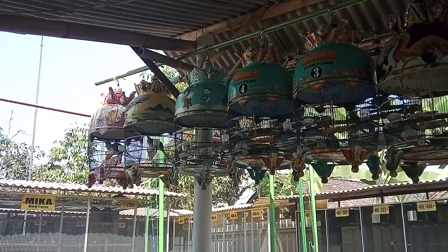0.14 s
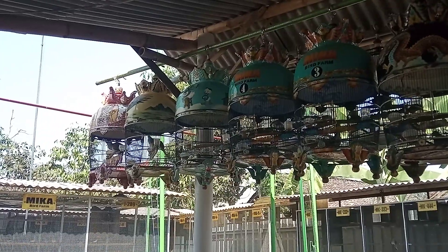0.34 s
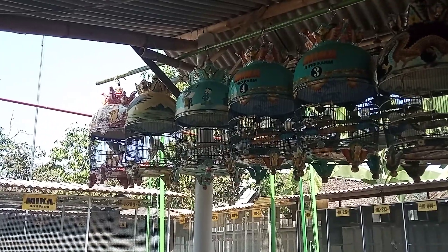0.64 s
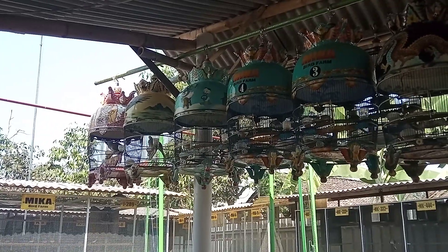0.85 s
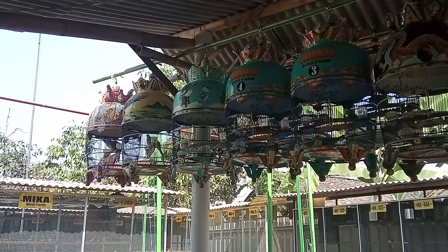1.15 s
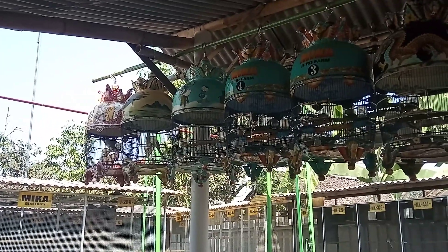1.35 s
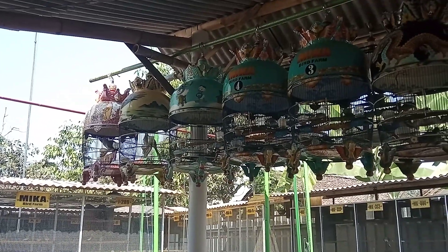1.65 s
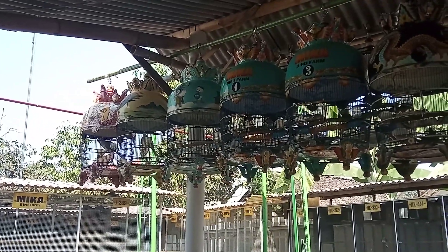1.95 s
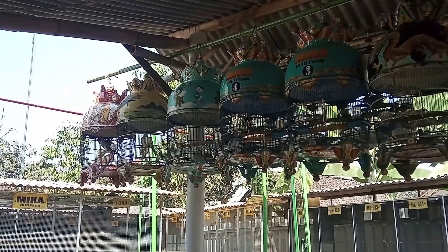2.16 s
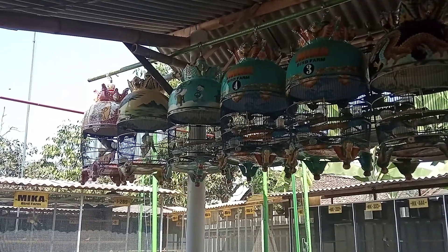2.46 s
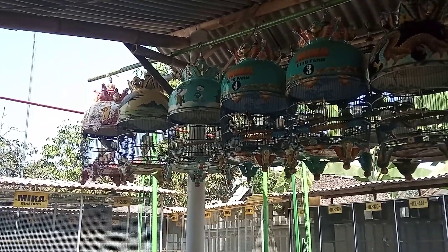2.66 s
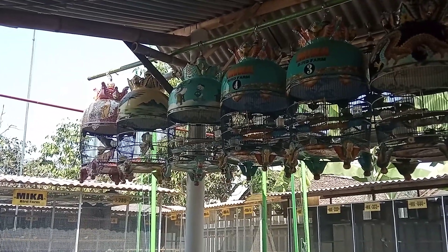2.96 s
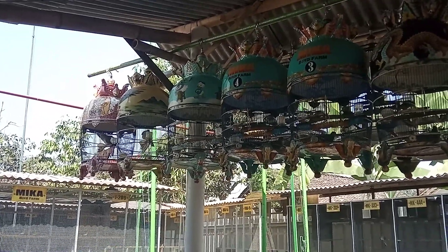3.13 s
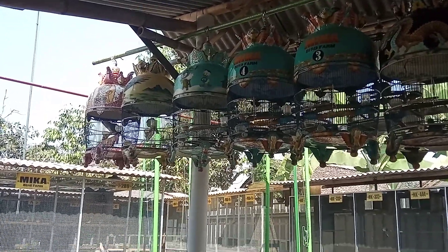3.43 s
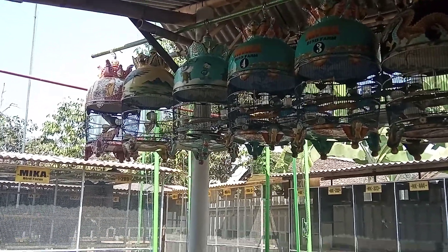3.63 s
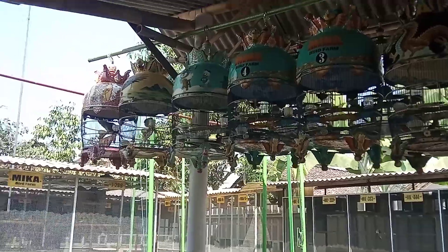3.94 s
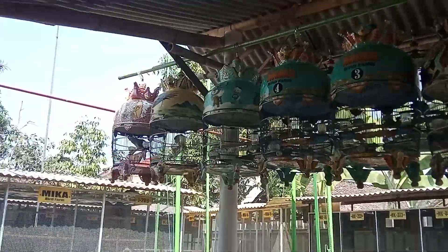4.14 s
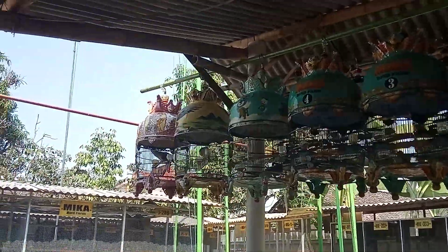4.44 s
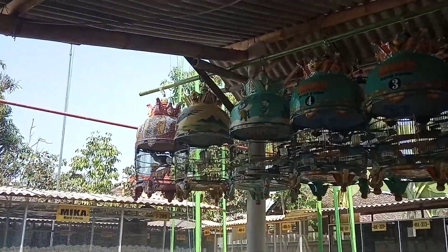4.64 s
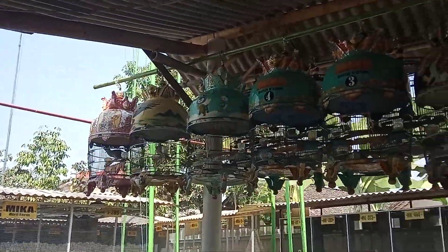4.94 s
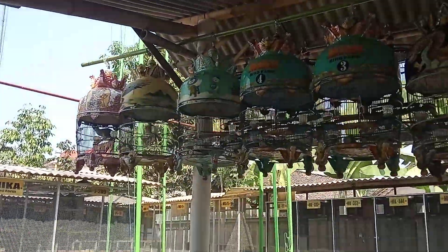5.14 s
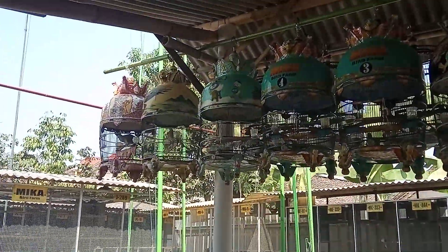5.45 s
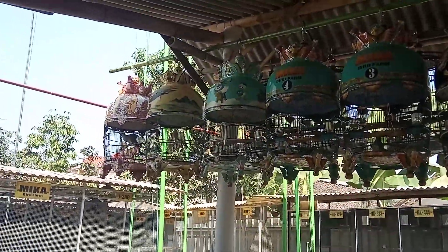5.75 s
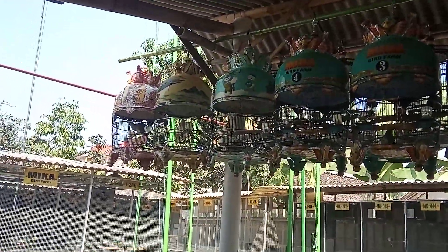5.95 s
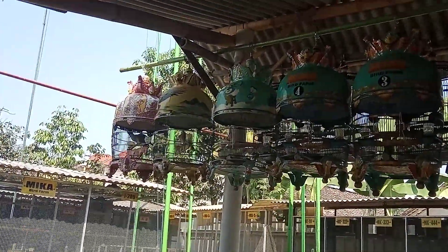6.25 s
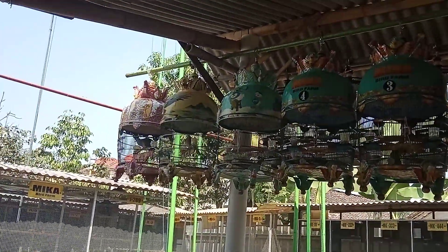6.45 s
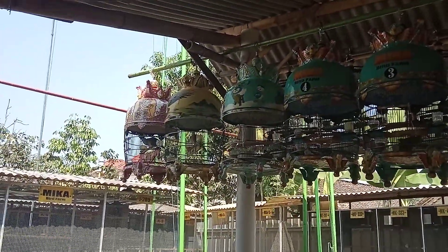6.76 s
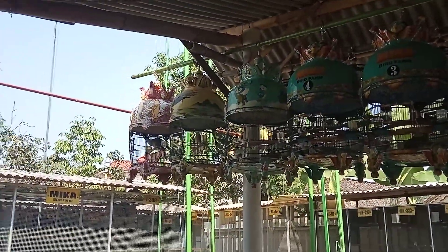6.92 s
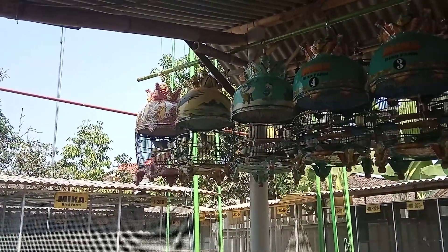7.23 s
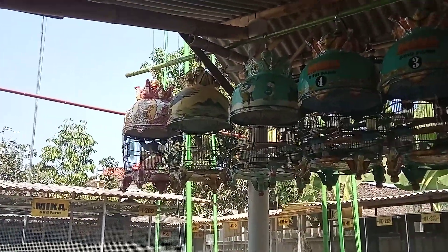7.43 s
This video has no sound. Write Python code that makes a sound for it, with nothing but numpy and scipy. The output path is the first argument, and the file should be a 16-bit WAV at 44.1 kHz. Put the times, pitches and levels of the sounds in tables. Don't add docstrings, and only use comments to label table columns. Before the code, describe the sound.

Several doves sing over one another, soft low coos giving way to louder higher ones, amid sparse chirps, husk cracks and low engine murmur.

```python
import sys
import numpy as np
from scipy import signal
from scipy.fft import rfft, irfft, next_fast_len
from scipy.io import wavfile
from scipy.ndimage import uniform_filter1d, map_coordinates

SR = 44100
rng = np.random.default_rng(int(sys.argv[2]) if len(sys.argv) > 2 else 0)


def makeup_ratio(level_db):
    decades = np.asarray(level_db, float) / 20
    return 10 ** decades


def dump(signal):
    limited = np.clip(np.atleast_2d(signal).T, -1, 1)
    pcm = np.round(limited * 32767).astype(np.int16)
    wavfile.write(sys.argv[1], SR, pcm)


N = 334719
TIME = np.arange(N) / SR


def unit(x):
    return x / np.sqrt(np.mean(x ** 2) + 1e-20)


def along(points, hz):
    f, v = np.transpose(points)
    return np.interp(np.log(hz + 1), np.log(f + 1), v)


def curves(rows):
    s, *columns = np.transpose(rows)
    return [np.interp(TIME, s, column) for column in columns]


def wobble(rate):
    knots = rng.standard_normal(int(8 * 200) + 4)
    return map_coordinates(knots, [TIME * min(rate, 199)])


def coloured(x, spectrum):
    m = next_fast_len(len(x) + 8192)
    closed = [(spectrum[0][0] * .8, -120), *spectrum, (spectrum[-1][0] * 1.2, -120)]
    gain = makeup_ratio(along(closed, np.fft.rfftfreq(m, 1 / SR)))
    return unit(irfft(rfft(x, m) * gain, m)[:len(x)])


def rush(spectrum, patchy_db, bins, frames):
    z = signal.stft(rng.standard_normal(N), nperseg=512)[2]
    field = uniform_filter1d(rng.standard_normal(z.shape), bins, axis=0)
    field = uniform_filter1d(field, frames, axis=1)
    patchy = signal.istft(z * makeup_ratio(patchy_db * unit(field)), nperseg=512)[1][:N]
    return coloured(patchy, spectrum)


def swell(s, length, rise, point):
    span = np.arange(max(round(s * SR), 0), min(round((s + length) * SR), N))
    u = np.clip((span / SR - s) / length, 0, 1)
    warp = np.log(.5) / np.log(np.clip(rise, .05, .95))
    return span, u, np.abs(np.sin(np.pi * u ** warp)) ** point


# start_s, pitch_hz, level_db
LEAD_NOTE = [
    (4.775, 855, -38),
    (4.81, 890.5, -35.5),
    (4.94, 868.3, -35),
    (4.981, 856, -29.5),
    (5.003, 848, -33.5),
    (5.022, 836, -31.5),
    (5.036, 825, -36),
]


def lead():
    hz, db = curves(LEAD_NOTE)
    to_nearer_end = np.minimum(TIME - LEAD_NOTE[0][0], LEAD_NOTE[-1][0] - TIME)
    held = np.clip(to_nearer_end / .008 + 1, 0, 1)
    return np.sqrt(2) * makeup_ratio(db) * held * np.sin(2 * np.pi * np.cumsum(hz) / SR)


# time_after_start_s, pitch_hz
PHRASE_PITCH = [
    (0, 641.5),
    (.16, 615),
    (.4, 592),
    (.52, 559),
    (.62, 502),
    (.74, 420),
]
PHRASE_TIMES = [
    0.217,
    2.575,
    4.87,
]


def phrase_hz(t):
    start = max(s for s in PHRASE_TIMES if s < t[-1])
    return np.interp(t - start, *np.transpose(PHRASE_PITCH))


def whistles(rows, octave_db, waver, flutter_db, rise, point):
    out = np.zeros(N)
    drift = 1 + waver * wobble(35 + 2500 * waver)
    flutter = makeup_ratio(flutter_db * wobble(35 + 1500 * waver))
    scoop = 0.033
    for s, length, db, *ends in rows:
        span, u, arch = swell(s, length, rise, point)
        if ends:
            hz = np.interp(u, [0, 1], ends) * (1 - scoop * (1 - arch))
        else:
            hz = phrase_hz(span / SR)
        phase = 2 * np.pi * np.cumsum(hz * drift[span]) / SR
        tone = np.sin(phase) + makeup_ratio(octave_db) * np.sin(2 * phase)
        out[span] += np.sqrt(2) * makeup_ratio(db) * arch * flutter[span] * tone
    return out


# start_s, length_s, level_db
PHRASE_SYLLABLES = [(.2, 0.22, -51), (.42, 0.14, -52.5), (.57, 0.1, -57), (.66, 0.14, -41),
                    (.79, 0.079, -47.5), (.86, 0.057, -53.5), (2.58, 0.091, -54.5), (2.685, 0.16, -46.5),
                    (2.85, 0.095, -52), (2.99, 0.14, -43.5), (3.12, 0.048, -48), (4.87, 0.1, -53.5),
                    (4.95, 0.14, -48.5), (5.12, 0.16, -54), (5.26, 0.12, -47), (5.38, 0.042, -44),
                    (5.44, 0.065, -50)]
# start_s, length_s, level_db, first_hz, last_hz
LOW_NOTES = [(-.08, 0.31, -51, 508, 412), (-.04, 0.15, -49, 580, 538), (.05, 0.19, -57, 575, 565),
             (1.59, 0.076, -59, 523, 640), (1.63, 0.13, -52.5, 697, 631), (1.685, 0.16, -47.5, 632, 605),
             (1.88, 0.1, -69.5, 634, 628), (2.075, 0.063, -57.5, 409, 495), (2.122, 0.054, -43.5, 478, 478),
             (2.18, 0.13, -48.5, 472.6, 456), (3.14, 0.156, -42, 486, 476), (3.22, 0.47, -53, 486, 461.5),
             (3.55, 0.12, -46.5, 461.5, 451), (3.98, 0.081, -55, 563, 685), (4.06, 0.13, -46.5, 657.3, 614),
             (4.09, 0.076, -60, 631, 631), (4.21, 0.097, -68.5, 606, 662)]
# start_s, length_s, level_db, first_hz, last_hz
HIGH_NOTES = [(2.93, 0.15, -46, 721, 805), (3.09, 0.1, -43.5, 778, 743), (4.7, 0.11, -40.5, 702.7, 741),
              (4.75, 0.052, -37.5, 752, 770), (5.05, 0.04, -36.5, 810, 770), (5.09, 0.022, -37, 820, 790),
              (5.385, 0.05, -39.5, 722, 722), (5.41, 0.068, -41.5, 722, 718), (5.49, 0.09, -49, 712, 705),
              (5.57, 0.095, -45, 700, 690), (5.84, 0.064, -44.5, 685, 726), (5.968, 0.034, -40.5, 725, 742),
              (6.01, 0.095, -40, 700, 682), (6.11, 0.048, -43.5, 691, 674), (6.61, 0.12, -46.5, 673, 726),
              (6.755, 0.155, -38.5, 700, 690), (6.955, 0.11, -46, 741, 725), (7.13, 0.13, -51.5, 738, 758),
              (7.21, 0.1, -47, 721, 572), (7.29, 0.23, -47, 712, 691), (7.45, 0.24, -46, 717, 683)]
# start_s, length_s, level_db, first_hz, last_hz
WARM_NOTES = [
    (5.735, 0.165, -32.5, 765, 776),
    (5.893, 0.035, -39, 770, 760),
    (5.94, 0.035, -39, 745, 730),
    (6.73, 0.185, -35, 750, 748),
    (6.915, 0.045, -39, 735, 745),
]
# start_s, length_s, level_db, first_hz, last_hz
REEDY_NOTES = [
    (.25, 0.444, -65, 667, 681),
    (.96, 0.68, -64.5, 667, 667),
]
# start_s, length_s, level_db, first_hz, last_hz
FAR_NOTES = [
    (2.82, 0.4, -49.5, 455, 435),
    (4.8, 0.2, -55, 490, 470),
    (4.58, 0.133, -60, 1190, 1300),
    (3.26, 0.567, -58, 590, 570),
    (6.51, 0.17, -58, 990, 890),
    (6.45, 0.45, -62.5, 620, 600),
]
# start_s, length_s, level_db, first_hz, last_hz
MURMUR_NOTES = [(1.0, 0.5, -66, 565, 575), (1.1, 0.12, -74, 450, 420), (0.57, 0.12, -78, 900, 910),
                (0.19, 0.08, -76, 870, 910), (0.18, 0.2, -70, 340, 310), (.8, .13, -54, 470, 455),
                (.13, 0.071, -76, 1400, 1260), (0.85, 0.14, -78, 1300, 1270), (1.33, 0.08, -72, 1170, 1140),
                (1.84, 0.16, -74, 810, 810), (2.1, 0.04, -72, 800, 800), (2.19, 0.04, -69, 800, 800),
                (2.27, 0.04, -69, 800, 800), (3.66, 0.081, -61, 440, 425), (3.74, 0.19, -67, 410, 385),
                (5.55, 0.16, -62.5, 430, 420), (1.18, .13, -77, 3600, 3550), (7.26, 0.19, -71, 1270, 1270),
                (7.36, .1, -66, 1340, 1370), (7.3, 0.156, -69, 1100, 1080), (6.5, 0.16, -65, 1270, 1260),
                (6.47, 0.13, -65, 1170, 1180), (6.66, 0.12, -65, 1150, 1110), (6.91, 0.05, -71, 1170, 1170),
                (1.65, 0.22, -78, 1400, 1640), (1.93, .09, -77, 1680, 1660), (4.278, .02, -66, 7150, 7150)]


def clear_coos():
    clear = lead()
    clear += whistles(PHRASE_SYLLABLES, octave_db=-48, waver=0.003, flutter_db=.6, rise=0.5, point=0.65)
    clear += whistles(LOW_NOTES, octave_db=-51, waver=.003, flutter_db=1.1, rise=.42, point=.7)
    clear += whistles(HIGH_NOTES, octave_db=-62, waver=.003, flutter_db=1.5, rise=0.47, point=0.6)
    clear += whistles(WARM_NOTES, octave_db=-33, waver=0.003, flutter_db=1.1, rise=.52, point=.7)
    clear += whistles(REEDY_NOTES, octave_db=-12, waver=0.006, flutter_db=3, rise=0.51, point=0.31)
    far = whistles(FAR_NOTES, octave_db=-40, waver=.038, flutter_db=4, rise=.45, point=.6)
    murmur = whistles(MURMUR_NOTES, octave_db=-40, waver=.016, flutter_db=5, rise=.45, point=.6)
    return clear + makeup_ratio(-5) * far + makeup_ratio(-3) * murmur


def roll(rows, throat, rate, breath, point, clean):
    cycle = np.cumsum(rate * makeup_ratio(1.6 * wobble(25))) / SR
    puffs = (.5 + .5 * np.cos(2 * np.pi * cycle)) ** 3
    beats = (np.diff(np.floor(cycle), prepend=0) > 0) * makeup_ratio(3.1 * wobble(70))
    source = unit((puffs + breath) * rng.standard_normal(N)) + clean * unit(beats)
    level = np.zeros(N)
    for s, length, db, rise in rows:
        span, _, arch = swell(s, length, rise, point)
        level[span] += makeup_ratio(db) * arch
    return level * coloured(source, throat)


# start_s, length_s, level_db, rise_share (of the length before the peak)
DEEP_ROLLS = [
    (-.05, 0.41, -57.5, 0.44),
    (1.595, 0.38, -62, 0.1),
    (2.07, 0.72, -54.5, 0.51),
    (2.28, 0.14, -64, 0.22),
    (2.62, 0.76, -60, 0.56),
    (3.975, 0.16, -58, 0.16),
    (4.42, .53, -56.5, 0.62),
    (7.17, 0.32, -57.5, 0.4),
]
# start_s, length_s, level_db, rise_share
HIGH_ROLLS = [
    (2.5, 0.16, -78, 0.79),
    (2.9, 0.4, -56.5, 0.37),
    (3.15, 0.63, -55.5, 0.22),
    (4.65, 0.29, -52, 0.5),
    (5.05, 0.16, -50.5, 0.056),
    (5.32, 0.22, -57.5, 0.2),
    (5.67, 0.71, -48.5, 0.38),
    (6.59, 0.56, -47, 0.64),
    (7.0, 0.52, -52.5, 0.35),
]
# pitch_hz, level_db
DEEP_RESONANCE = [(360, -35), (430, -14.5), (540, 8), (600, 5), (670, -9.5), (780, -19.5)]
# pitch_hz, level_db
HIGH_RESONANCE = [(320, -100), (540, -30.5), (666, -1), (738, 1.5), (827, 0.5), (900, -3.5), (1080, -26),
                  (1300, -35.5), (1690, -113), (2860, -120)]


def hoarse_coos():
    deep = roll(DEEP_ROLLS, DEEP_RESONANCE, rate=38, breath=0.12, point=1.0, clean=.8)
    return deep + roll(HIGH_ROLLS, HIGH_RESONANCE, rate=66, breath=0.2, point=0.75, clean=1.5)


# start_s, level_db, pitch_hz, hold_s (before the drop)
SPARROW_CHIRPS = [(0.234, -58, 4300, 0.014), (0.9712, -54.5, 4300, 0.017), (1.095, -55.5, 3584, 0.03),
                  (2.0859, -54.5, 4200, 0.019), (2.396, -55, 3550, 0.03), (3.002, -51.5, 4400, 0.017),
                  (3.1533, -50, 3560, 0.033), (3.9932, -50.5, 4300, 0.01), (4.174, -49, 3600, 0.036),
                  (4.757, -47.5, 4400, 0.02), (5.0624, -50.5, 3500, 0.032), (5.5675, -49, 4300, 0.018),
                  (5.975, -49.5, 4310, 0.017), (6.1518, -50, 3600, 0.043), (6.515, -60, 3915, .07),
                  (6.9588, -50.5, 4300, 0.018)]


def sparrows():
    out, t = np.zeros(N + SR), TIME[:SR // 5]
    chirp_s, drop_s = 0.09, 0.04
    end_hz, sag_hz_per_s = 2857, 5000
    buzz_depth = 0.11
    shape = np.abs(np.sin(np.pi * np.clip(t / chirp_s, 0, 1) ** .6)) ** .8
    for s, db, hz, hold in SPARROW_CHIRPS:
        trill_depth, trill_hz = rng.uniform(.02, .05), rng.uniform(90, 170)
        trill = trill_depth * np.sin(2 * np.pi * trill_hz * t + rng.uniform(0, 6))
        uneven = 1 + .15 * unit(uniform_filter1d(rng.standard_normal(len(t)), size=400))
        buzz = buzz_depth * np.sin(2 * np.pi * np.cumsum(500 * uneven) / SR)
        drop = np.sin(np.pi / 2 * np.clip((t - hold) / drop_s, 0, 1)) ** 2
        sag = sag_hz_per_s * np.maximum(t - hold - drop_s, 0)
        glide = hz + (end_hz - hz) * drop - sag
        phase = 2 * np.pi * np.cumsum(glide * (1 + trill + buzz)) / SR
        scratch = makeup_ratio(4 * unit(uniform_filter1d(rng.standard_normal(len(t)), size=180)))
        rasp = coloured(rng.standard_normal(len(t)), [(2400, 3.5), (3500, 31.5), (6500, 13.0), (8000, -40)])
        tone = np.sin(phase) + makeup_ratio(-14) * np.sin(2 * phase) + makeup_ratio(-8) * rasp
        out[round(s * SR):][:len(t)] += makeup_ratio(db - 9) * shape * scratch * tone
    return out[:N]


# start_s, level_db, dull_db (dull part)
WIRE_TICKS = [(0.419, -50, -4.5), (1.295, -46, -17), (1.3348, -49.5, 6), (1.609, -46, -21),
              (1.705, -46, -34), (1.7573, -48.5, -41), (1.8087, -41, -28), (2.2284, -48.5, -10),
              (2.394, -49, 7.5), (2.527, -53, -3), (3.975, -55.5, 1), (4.368, -51, -27),
              (4.414, -45, -13.5), (4.461, -47.5, -30), (4.618, -58, -10), (4.664, -57, -21),
              (4.753, -46.5, -2.5), (5.296, -63, -17), (5.658, -66.5, 3), (5.7234, -55, -1.5),
              (5.9561, -54.5, 3.5), (6.124, -50, -13), (6.1726, -61, 17.5), (6.21, -55, 9),
              (6.497, -61, -24), (6.608, -49.5, -13), (6.683, -51.5, -21), (7.5071, -45.5, -27)]
# pitch_hz, level_db, t60_s
WIRE_MODES = [(6150, 8, 0.07), (6760, -6, 0.1), (7140, 14, 0.07), (8400, 12, 0.075), (9480, 9, 0.06),
              (3800, 0, 0.2)]
# pitch_hz, level_db
RATTLE_SPECTRUM = [(2350, -44), (3900, -5), (5200, -11), (6200, 5), (8500, 4), (10500, 0), (13100, -4),
                   (15600, -11.5)]


def ticks():
    out, t = np.zeros(N + SR), TIME[:SR // 6]
    for s, db, dull_db in WIRE_TICKS:
        ring = np.zeros(len(t))
        for hz, level, t60 in WIRE_MODES:
            decay = makeup_ratio(level + rng.normal(0, 4) - 60 * t / t60)
            ring += decay * np.sin(2 * np.pi * hz * rng.normal(1, 0.019) * t)
        rattle = coloured(rng.standard_normal(len(t)), RATTLE_SPECTRUM)
        rattle *= makeup_ratio(-60 * t / 0.17) + makeup_ratio(-60 * t / 0.006)
        dull = coloured(rng.standard_normal(len(t)), [(2300, -4.0), (3200, 7.5), (4600, -1.5)])
        dull *= makeup_ratio(dull_db - 60 * t / 0.14)
        onset = 1 - np.exp(-t / 0.0011)
        out[round(s * SR):][:len(t)] += makeup_ratio(db - 9.5) * onset * (makeup_ratio(-10) * ring + rattle + dull)
    return out[:N]


# start_s, level_db
HUSK_CRACKS = [(0.1257, -56.5), (0.613, -65), (0.6504, -59.5), (0.7206, -55), (0.817, -63), (0.862, -56),
               (1.058, -54.5), (1.934, -49), (2.0205, -51), (2.1137, -50), (2.1678, -55), (2.378, -54),
               (2.7307, -52), (2.8464, -53), (2.916, -50), (3.155, -53), (3.334, -53), (3.5498, -66),
               (3.683, -55.5), (3.847, -65), (3.8681, -62), (4.281, -55), (4.56, -58), (4.8336, -51),
               (4.903, -46), (5.357, -48.5), (5.403, -57.5), (5.439, -50), (5.876, -50.5), (6.06, -49.5),
               (6.35, -48.5), (6.552, -50), (7.001, -69), (7.0838, -49), (7.1527, -49), (7.199, -60),
               (7.329, -56)]
# pitch_hz, level_db
HUSK_SPECTRUM = [(2500, -7), (4500, -9.5), (6500, 2), (8000, -3.5), (10000, 3.5), (13000, -7.5),
                 (15600, -6)]


def husks():
    out, t = np.zeros(N + SR), TIME[:SR // 6]
    fade = makeup_ratio(-60 * t / 0.008) + 1.25 * makeup_ratio(-60 * t / 0.26)
    for s, db in HUSK_CRACKS:
        crack = coloured(rng.standard_normal(len(t)), HUSK_SPECTRUM)
        out[round(s * SR):][:len(t)] += makeup_ratio(db - 16.0) * fade * crack
    return out[:N]


# start_s, level_db
WIRE_SNAPS = [
    (0.4196, -54),
    (1.3357, -46),
    (5.283, -50),
    (5.9585, -38.5),
    (6.0581, -50),
    (6.175, -35.5),
    (7.5076, -44),
]
# pitch_hz, level_db
SNAP_SPECTRUM = [(1500, -14), (3000, -13), (6000, 0), (9000, -9), (14000, -21)]


def snaps():
    blows = np.zeros(N)
    for s, db in WIRE_SNAPS:
        blows[round(s * SR)] = makeup_ratio(db)
    click = coloured(np.arange(201) == 100, SNAP_SPECTRUM)
    return signal.fftconvolve(blows, click / click.max(), "same")


# start_s, level_db, length_s
WING_BEATS = [
    (1.465, -48, 0.092),
    (2.598, -56.5, 0.059),
    (2.768, -53, 0.072),
    (5.326, -53.5, 0.13),
    (7.189, -56, 0.026),
    (7.474, -53, 0.31),
]
# pitch_hz, level_db
PUFF_SPECTRUM = [(130, 4.5), (300, 3.5), (650, 0.5), (900, -15)]


def wings():
    out, t = np.zeros(N + SR), TIME[:SR // 5]
    for s, db, length in WING_BEATS:
        shape = np.sin(np.pi * np.clip(t / length, 0, 1) ** 0.45) ** 0.9
        puff = coloured(rng.standard_normal(len(t)), PUFF_SPECTRUM)
        out[round(s * SR):][:len(t)] += makeup_ratio(db - 7.0) * shape * puff
    return out[:N]


# pitch_hz, t60_s
ROOF_DECAY = [(300, 0.25), (1000, 0.35), (4000, 0.33), (12000, 0.066)]


def roof(x):
    hz, t, z = signal.stft(rng.standard_normal(SR // 2), SR, nperseg=256)
    decay = makeup_ratio(-60 * t / along(ROOF_DECAY, hz)[:, None])
    tail = signal.istft(z * decay, SR, nperseg=256)[1]
    delayed = np.pad(x, (300, 0))
    return signal.fftconvolve(delayed, tail / np.linalg.norm(tail))[:N]


# start_s, level_db
ROAD_LEVEL = [
    (0.0, -68),
    (0.32, -75.5),
    (7.59, -68),
]
# start_s, depth_db
ENGINE_LULLS = [(.48, 14.5), (1.18, 10.5), (1.53, 25.5), (1.97, 26), (2.641, 32.5), (3.06, 23.5),
                (3.46, 8.5), (3.8, 2.5), (4.232, 15), (4.62, -1), (5.401, 14.5), (5.849, 23.5)]
FIRING_LINES = [-1, -9, -8.5, -26.5]
# pitch_hz, level_db
ROAR_SPECTRUM = [(15, -71), (25, -10.5), (65, 8.5), (150, 6.5), (195, 0.5), (241, -2.5), (356, -19.5),
                 (420, -34), (550, -49), (920, -120)]
# start_s, length_s, level_db, first_hz, last_hz
ENGINE_REVS = [
    (-.05, 0.49, -60, 121.2, 147),
    (3.13, 0.44, -59.5, 167.7, 164.7),
    (3.52, 0.22, -55, 164.4, 172),
    (3.75, 0.29, -58.5, 185.2, 155.4),
    (6.1, 0.25, -61.5, 254.5, 229),
    (6.635, 0.18, -50, 250, 232),
]


def engine():
    load_db = -66.5 + 1.5 * TIME
    lull_s = 0.071
    for s, depth_db in ENGINE_LULLS:
        load_db -= depth_db * np.exp(-((TIME - s) / lull_s) ** 2)
    shaft = np.pi * np.cumsum(72 * (1 + 0.02486 * wobble(7.8))) / SR
    lines = np.zeros(N)
    for k, db in enumerate(FIRING_LINES):
        lines += makeup_ratio(db + 4.2 * wobble(13)) * np.sin((k + 2) * shaft)
    revs = whistles(ENGINE_REVS, octave_db=-25.5, waver=0.018, flutter_db=4, rise=.35, point=1.2)
    swell_db = 0.31 * (load_db - load_db.mean())
    roar_level = makeup_ratio(curves(ROAD_LEVEL)[0] + swell_db + 6.5)
    roar = roar_level * rush(ROAR_SPECTRUM, patchy_db=5.5, bins=3, frames=8)
    return makeup_ratio(load_db + 0.5) * lines + roar + revs


# start_s, length_s, hiss_db, rustle_db
YARD_SWELLS = [(-.03, 0.09, -71, -67), (0.163, 0.14, -72, -75), (0.223, 0.3, -62.5, -90),
               (0.45, 0.11, -71.5, -74), (0.835, 0.39, -67.5, -93), (1.27, 0.25, -64.5, -84.5),
               (1.58, 0.22, -71, -86), (1.773, 0.41, -67, -83.5), (2.107, 0.45, -64.5, -106),
               (2.317, 0.47, -60, -71.5), (2.684, 0.33, -69, -82.5), (2.91, 0.6, -68.5, -72.5),
               (3.114, 0.47, -62.5, -70), (3.583, 0.56, -78, -91.5), (3.847, 0.096, -68, -70.5),
               (3.92, 0.53, -64, -86), (4.482, 0.084, -64, -70), (4.647, 0.45, -61, -80),
               (4.827, 0.54, -57, -64.5), (5.24, 0.17, -63.5, -62.5), (5.392, 0.55, -59.5, -71),
               (5.916, 0.65, -57.5, -72.5), (6.337, 0.15, -75, -68), (6.484, 0.58, -60, -83.5),
               (6.637, 0.14, -62, -64.5), (6.836, 1, -65.5, -75.5), (7.172, 0.16, -55.5, -73),
               (7.488, 0.57, -61, -71)]
# pitch_hz, level_db
HISS_SPECTRUM = [(1290, -1.5), (2200, -41.5), (3210, -40), (3690, 0), (4950, 1), (5420, 2), (6330, 4.5),
                 (7970, -5.5), (9860, 2.5), (12500, -6.5), (15600, -10)]
# pitch_hz, level_db
RUSTLE_SPECTRUM = [(280, -2), (900, -15), (1150, -7), (1500, -1.5), (2300, -8), (3800, -6)]


def yard():
    calm_hiss = makeup_ratio(-73.5)
    hiss, rustle = np.full(N, calm_hiss), np.full(N, makeup_ratio(-92))
    for s, length, hiss_db, rustle_db in YARD_SWELLS:
        span, _, arch = swell(s, length, rise=0.26, point=1.69)
        hiss[span] += makeup_ratio(hiss_db) * arch
        rustle[span] += makeup_ratio(rustle_db) * arch
    strikes = (rng.random(N) < 90 / SR) * makeup_ratio(3 * rng.normal(size=N))
    crackle = signal.fftconvolve(strikes, makeup_ratio(-60 * TIME[:SR // 8] / .045))[:N]
    grainy = coloured(crackle * rng.standard_normal(N), HISS_SPECTRUM)
    air = rush(HISS_SPECTRUM, patchy_db=5.5, bins=24, frames=4)
    far = makeup_ratio(-5.0) * (hiss * air + makeup_ratio(-3) * (hiss - calm_hiss / 2) * grainy)
    return far + rustle * makeup_ratio(4.44) * rush(RUSTLE_SPECTRUM, patchy_db=5.5, bins=3, frames=10)


def scene():
    clear, hoarse = clear_coos(), hoarse_coos()
    chirps, knocks = sparrows(), ticks() + husks() + snaps()
    echoes = roof(makeup_ratio(-9.5) * clear + makeup_ratio(-3.5) * hoarse + makeup_ratio(-3.0) * chirps + makeup_ratio(-9) * knocks)
    return (clear + hoarse + chirps + knocks + echoes + wings() + engine() + yard())[None]


def top_cut(x):
    return signal.sosfilt(signal.butter(12, 15750, fs=SR, output="sos"), x)


def record(dry):
    edge = signal.butter(N=10, Wn=15700, fs=SR, output="sos")
    mix = signal.sosfiltfilt(edge, dry)
    return top_cut(mix)


dry = scene()
out = record(dry)
dump(out)
```